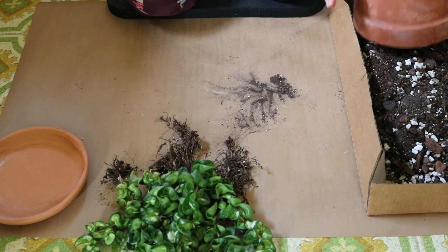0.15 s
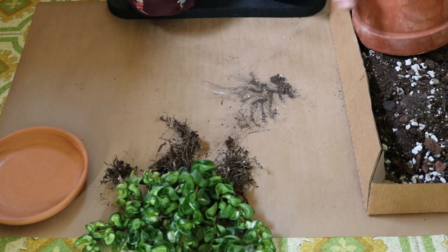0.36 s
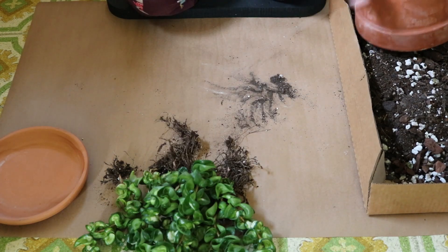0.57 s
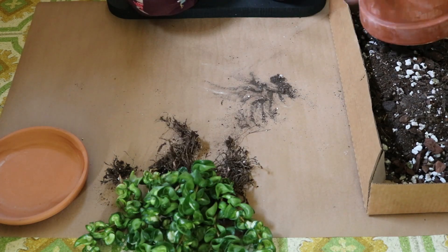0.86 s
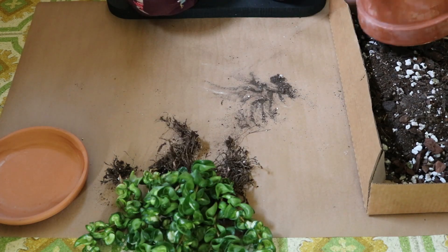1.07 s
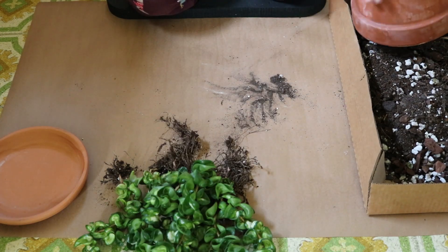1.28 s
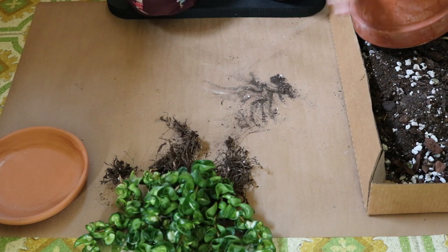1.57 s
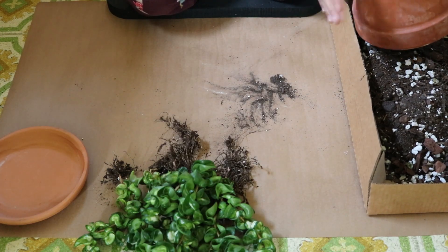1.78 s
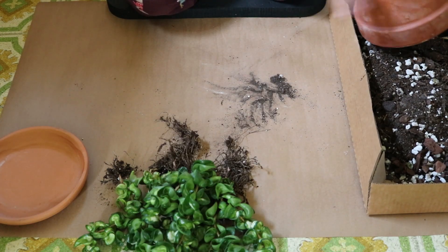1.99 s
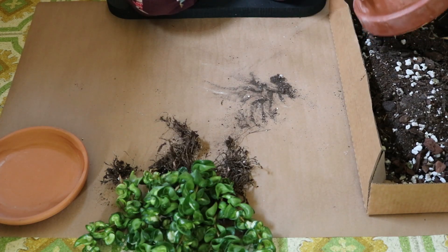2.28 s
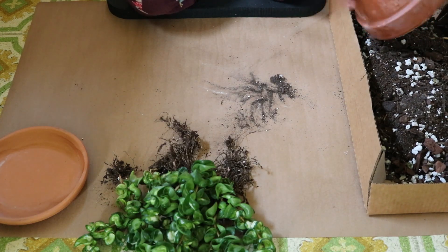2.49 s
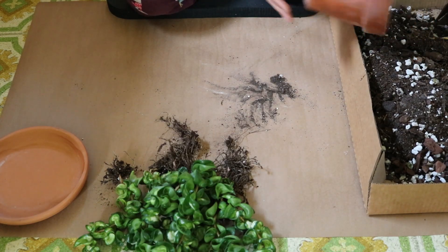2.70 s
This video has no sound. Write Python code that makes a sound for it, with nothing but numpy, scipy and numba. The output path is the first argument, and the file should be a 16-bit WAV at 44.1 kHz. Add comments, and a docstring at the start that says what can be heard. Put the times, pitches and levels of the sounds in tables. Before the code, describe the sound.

Sharp, clinking knocks on an upturned clay pot, after a brief rustle and a dull thump.

```python
"""Hands are heard first, rustling on a clay flower pot and cardboard; the pot is set down with a hollow thump
and small ticks, then, upturned, rapped about five times a second with something hard, close by indoors.
Each rap is a scattered pulse, a sum of decaying modes and a cavity tone. Bumps are damped modes with grit,
ticks are faint strikes, and rustle is grainy noise that partly drives the modes. A diffuse tail follows
each impact; mains hum and room noise lie beneath, and gain control and rounded peaks shape the whole."""
import sys
import numpy as np
from scipy import signal
from scipy.fft import rfft, irfft
from scipy.io import wavfile
from scipy.ndimage import uniform_filter1d
from numba import njit

SR = 44100
rng = np.random.default_rng(int(sys.argv[2]) if len(sys.argv) > 2 else 0)


def gain_from_db(level_db):
    """Convert decibel levels to linear amplitude factors (20 dB per decade)."""
    decades = np.asarray(level_db, float) / 20
    return 10 ** decades


def unload_wav(signal):
    """Save mono or channel-first audio to the path in sys.argv[1] as 16-bit WAV at rate SR, clipped to [-1, 1]."""
    wavfile.write(
        sys.argv[1],
        SR,
        np.round(np.clip(np.atleast_2d(signal).T, -1, 1) * 32767).astype(np.int16),
    )


N = 125685  # samples in the scene
SPAN = 32768  # samples in one impact or room response
STRIKE_RISE_S = 0.0012  # rise time constant of the pot's modes

# Raps; the ring depends on the spot struck. Columns: t/s, crack level/dB, treble level/dB,
# then relative ring level/dB of the modes near 2.1, 2.4, 3.1 and 3.4-4 kHz
RAP_TABLE = [(0.528, -12.5, -30.5, -34, -32.5, -31, -23.5), (0.73, -9.5, -25.5, -41, -26.5, -32, -37),
             (0.939, -1.5, -22.5, -14, -14, -47, -22.5), (1.136, -0.5, -22, -15.5, -19, -14, -7),
             (1.315, -1, -20.5, -8, -11, -8, -6.5), (1.504, -4, -15, -32, -20, -10, -2),
             (1.689, -1, -20, -9, -15, -35, -9), (1.88, -2, -22.5, -16, -11, -12, -15.5),
             (2.07, -2, -18, -22, -26.5, -41, -13), (2.269, -3, -20.5, -37, -15.5, -10, -10.5),
             (2.47, -1.5, -19.5, -21, -11, -9.5, -15.5)]


def raps():
    """Impact excitation: each blow drives the wall's modes and the resonance of the air in the pot."""
    ring_offset_db = -10
    cavity_hz, cavity_t60_s, cavity_db, cavity_rise_s = 432.5, 0.39, -32, 0.032  # dB relative to the crack
    out = np.zeros(N)
    for at_s, db, treble_db, *ring_db in RAP_TABLE:
        wall = strike(db, treble_db, ring_offset_db + np.array(ring_db))
        cavity = ring(cavity_hz, db + cavity_db, cavity_t60_s, cavity_rise_s)
        add(out, at_s, wall + cavity)
    return out


# Modes of the pot's wall. Columns: f/Hz, relative level/dB, t60/s
POT_MODES = [(1098, -1.5, 0.15), (1415, 15, 0.048), (1736, -9, 0.057), (2134, -2.5, 0.32), (2421, -3, 0.2),
             (2442, -1, 0.16), (2563, -16, 0.28), (2850, -26, 0.75), (3110, -5.5, 0.24), (3380, 4.5, 0.083),
             (3540, -16, 0.056), (3800, -10, 0.16), (3910, -13, 0.067), (4254, 0.5, 0.13), (4890, 1, 0.18),
             (5480, 2.5, 0.27), (5550, -4.5, 0.22)]
# Boundaries between groups of modes that share a ring level. Column: f/Hz
GROUP_EDGES = [2000, 2250, 2700, 3250, 4200]


def strike(db, treble_db, group_db):
    """Modal superposition: a broadband crack plus decaying modes that waver under the grip."""
    low_ring_db, top_ring_db = -38, -21  # modes under 2 kHz follow the crack, those over 4.2 kHz its treble
    mode_scatter_db = 1
    flutter_hz, flutter_db = 120.4, 5
    quick_db, quick_t60_s = 7, 0.022  # damped neighbours, sounded at each mode's pitch, die at once
    levels_db = np.r_[db + low_ring_db, group_db, treble_db + top_ring_db]
    scatter_db = mode_scatter_db * rng.standard_normal(len(POT_MODES))
    out = crack(db, treble_db)
    for k, (hz, mode_db, t60) in enumerate(POT_MODES):
        flutter = gain_from_db(flutter_db * walk(flutter_hz, count=SPAN))
        level = gain_from_db(mode_db + scatter_db[k] + levels_db[np.searchsorted(GROUP_EDGES, hz)])
        lasting = ring(hz, 0, t60, STRIKE_RISE_S)
        quick = (-1) ** k * ring(hz, quick_db, quick_t60_s, STRIKE_RISE_S)
        out = out + flutter * level * (lasting + quick)
    return out


# Spectrum of the crack. Columns: f/Hz, relative level/dB
CRACK_SPECTRUM = [(59, -30), (100, -15.5), (406, 4), (768, 2), (3400, 4.5), (4200, 0.5), (5080, 5),
                  (6150, -4.5), (9020, -6), (16000, -27)]
# Typical lengths of the paths by which the blow spreads through the wall. Column: t/ms
SCATTER_PATHS = [.09, .2, .43, 1.1]


def crack(db, treble_db):
    """Minimum phase and all-pass dispersion: a causal pulse is smeared without changing its spectrum."""
    crack_offset_db, treble_offset_db = 13.5, 18
    treble_from_hz, treble_full_hz = 4480, 7570
    patch_hz, patch_db = 500, 2.5  # spacing and spread of the random bumps of colour in each crack
    scatter_gain = 0.62
    f = np.fft.rfftfreq(SPAN, 1 / SR)
    patch_f = np.arange(0, SR / 2, patch_hz)
    patches = patch_db * np.interp(f, patch_f, rng.standard_normal(len(patch_f)))
    balance = read([(treble_from_hz, db), (treble_full_hz, treble_db + treble_offset_db)], f)
    cepstrum = irfft(np.log(gain_from_db(patches + read(CRACK_SPECTRUM, f) + balance)))
    # folding the cepstrum onto positive times gives minimum phase
    fold = np.r_[1, np.full(SPAN // 2 - 1, 2), 1, np.zeros(SPAN // 2 - 1)]
    pulse = irfft(np.exp(rfft(cepstrum * fold)))[:4096]
    for ms in np.array(SCATTER_PATHS) * rng.uniform(0.76, 1.3, len(SCATTER_PATHS)):
        gap = np.zeros(int(ms * SR / 1000))
        pulse = signal.lfilter(np.r_[scatter_gain, gap, 1], np.r_[1, gap, scatter_gain], pulse)
    return gain_from_db(crack_offset_db) * np.pad(pulse, (0, SPAN - len(pulse)))


# Soft bumps on the cardboard; those near 0.23 s form the thump. Columns: t/s, level/dB, f/Hz, t60/s
BUMP_TABLE = [(.233, -15.5, 408, 0.069), (.235, -18, 560, 0.041), (0.23, -20, 475, 0.065),
              (0.18, -30.5, 510, 0.028), (0.39, -30, 1500, 0.045), (.236, -15, 2520, 0.038),
              (.021, -21, 1000, 0.029), (.098, -22, 1370, 0.017), (1.583, -12.5, 1070, 0.013),
              (0.84, -24, 740, .015)]


def bumps():
    """Damped resonance: a soft contact gives one short mode and a burst of noise with the same decay."""
    rise_s, grit_db, grit_tilt_db = 0.003, -6, -3.5  # tilt per octave
    out = np.zeros(N)
    for at_s, db, hz, t60 in BUMP_TABLE:
        noise = colour(rng.standard_normal(SPAN), CRACK_SPECTRUM, grit_tilt_db)
        grit = gain_from_db(db + grit_db) * fade(t60, rise_s) * noise
        add(out, at_s, ring(hz, db, t60, rise_s) + grit)
    return out


# Small hard ticks. Columns: t/s, crack level/dB, treble level/dB, relative ring level/dB
TICK_TABLE = [(0.183, -27, -45.5, -48), (.192, -36, -43, -62), (0.255, -38, -36, -57),
              (.301, -13.5, -30.5, -44.5), (.395, -31, -48, -82), (.5054, -29.5, -42.5, -58),
              (1.054, -45, -42, -56), (1.463, -27, -46, -43), (1.478, -38, -45, -56)]


def ticks():
    """Impact excitation by small contacts: faint strikes with one level for all middle mode groups."""
    out = np.zeros(N)
    for at_s, db, treble_db, ring_db in TICK_TABLE:
        add(out, at_s, strike(db, treble_db, np.full(len(GROUP_EDGES) - 1, ring_db)))
    return out


# Rustle of hands on pot and cardboard. Columns: t/s, rub level/dB, level/dB of the pot ringing with it
RUSTLE_LEVELS = [(0, -36.5, -56), (.05, -41.5, -48), (.12, -40.5, -58), (.22, -48, -62), (0.301, -38, -47),
                 (.42, -51.5, -85), (.9, -50.5, -78), (2.6, -47, -62), (2.72, -48, -55), (2.85, -46, -50)]
# Spectrum of the rub. Columns: f/Hz, relative level/dB
RUSTLE_SPECTRUM = [(88, -41), (150, -23), (383, 4), (431, -8), (745, -3.5), (1360, -5.5), (2400, -11.5),
                   (2650, -7.5), (16000, -31.5)]


def rustle():
    """Friction excitation: grainy noise is heard directly and also drives the pot's modes."""
    grain_db, grain_samples = 2, 128
    steps = np.repeat(rng.standard_normal(N // grain_samples + 1), grain_samples)[:N]
    noise = gain_from_db(grain_db * steps) * rng.standard_normal(N)
    pot = sum(ring(hz, db, t60, STRIKE_RISE_S) for hz, db, t60 in POT_MODES)
    ringing = signal.fftconvolve(noise, pot)[:N]
    at_s, rub_db, ring_db = np.array(RUSTLE_LEVELS).T
    t = np.arange(N) / SR
    rub = gain_from_db(np.interp(t, at_s, rub_db)) * colour(noise, RUSTLE_SPECTRUM)
    return rub + gain_from_db(np.interp(t, at_s, ring_db)) * ringing / ringing.std()


# Mains hum partials. Columns: f/Hz, rms level/dB before the waver
HUM_PARTIALS = [(59.6, -56), (119.2, -63)]


def hum():
    """Harmonic tone: two mains partials, each with a slow random amplitude modulation."""
    waver_hz, waver_db = 5.32, 0.5
    t = np.arange(N) / SR
    out = np.zeros(N)
    for hz, db in HUM_PARTIALS:
        level = np.sqrt(2) * gain_from_db(db + waver_db * walk(waver_hz, count=N))
        out += level * np.sin(2 * np.pi * hz * t)
    return out


# Spectrum of the room noise. Columns: f/Hz, relative level/dB
AIR_SPECTRUM = [(20, -19), (45, 0), (75, 0.5), (141, -2), (184, -1), (404, -3), (690, -6.5), (1800, -23.5),
                (3810, -21.5), (16000, -34.5)]


def room_noise():
    """Stationary random noise: Gaussian noise with a fixed spectrum."""
    return gain_from_db(-52) * colour(rng.standard_normal(N), AIR_SPECTRUM)


# Reverberation time of the room. Columns: f/Hz, t60/s
ROOM_DECAY = [(150, 0.31), (400, 0.44), (1000, 0.42), (2800, 0.42), (7000, 0.44), (14000, 0.13)]


def room():
    """Diffuse-field reverberation: direct sound, then octave bands of noise, each decaying at its own rate."""
    tail_db, build_s = -6.5, 0.0088  # tail energy relative to the direct sound; build-up time constant
    f = np.fft.rfftfreq(SPAN, 1 / SR)
    noise = rfft(rng.standard_normal(SPAN))
    tail = np.zeros(SPAN)
    for hz in 125 * 2. ** np.arange(8):
        share = np.clip(1 - np.abs(np.log2(np.maximum(f, 125) / hz)), 0, 1)  # overlapping octaves
        tail += irfft(noise * share) * fade(read(ROOM_DECAY, hz), build_s)
    tail = gain_from_db(tail_db) * tail / np.sqrt(np.sum(tail ** 2))
    return np.concatenate([[1.], tail[1:]])


def add(out, at_s, sound):
    """Convolution with a random room response drawn anew for every sound."""
    i = int(at_s * SR)
    wet = signal.fftconvolve(sound, room())[:min(SPAN, N - i)]
    out[i:i + len(wet)] += wet


def ring(hz, db, t60, rise):
    """Damped oscillation: one decaying sinusoidal mode."""
    return gain_from_db(db) * fade(t60, rise) * np.sin(2 * np.pi * hz * np.arange(SPAN) / SR)


def fade(t60, rise):
    """Exponential damping: a quick rise, then a fall of 60 dB in t60 seconds."""
    t = np.arange(SPAN) / SR
    return (1 - np.exp(-t / rise)) * np.exp(-np.log(1000) * t / t60)


def colour(x, table, tilt_db=0.):
    """Spectral shaping: noise filtered to a tabled spectrum, rms 1; tilt in dB per octave."""
    f = np.fft.rfftfreq(len(x), 1 / SR)
    tilt = tilt_db * np.log2(np.maximum(f, 50) / 2e3)
    y = irfft(rfft(x) * gain_from_db(read(table, f) + tilt), len(x))
    return y / np.sqrt(np.mean(y ** 2))


def read(table, hz):
    """Logarithmic frequency scale: table values joined by straight lines over log f."""
    f, v = np.array(table, float).T
    return np.interp(np.log(np.maximum(hz, 1)), np.log(f), v)


def walk(hz, count):
    """Low-pass random modulation: a smooth random curve with a spread near 1."""
    k = int(SR / hz)
    steps = np.repeat(rng.standard_normal(count // k + 1), k)
    return 1.64 * uniform_filter1d(steps, k)[:count]


@njit
def follow(x, attack, release):
    """Envelope detection: a peak follower with separate rates of rise and fall."""
    y, e = np.empty(len(x)), 0.
    for i in range(len(x)):
        e += (abs(x[i]) - e) * (attack if abs(x[i]) > e else release)
        y[i] = e
    return y


def scene():
    """Linear superposition: all sources add at one microphone."""
    impacts = raps() + bumps() + ticks()
    return (impacts + rustle() + hum() + room_noise())[None]


def low_pass(x):
    """Removes everything above the highest recorded frequency."""
    return signal.sosfilt(signal.butter(12, 16470, fs=SR, output="sos"), x)


def record(dry):
    """Dynamic compression and saturation: gain control turns down loud moments, then peaks are rounded."""
    threshold, ratio, attack_s, release_s = gain_from_db(-15), 1.502, 0.007, 0.027
    clip_drive = 1.26
    envelope = follow(dry[0], 1 / (attack_s * SR), 1 / (release_s * SR))
    gain = (threshold / np.maximum(envelope, threshold)) ** (1 - 1 / ratio)
    mix = np.tanh(clip_drive * dry * gain) / np.tanh(clip_drive)
    return low_pass(mix)


dry = scene()
out = record(dry)
unload_wav(out)
```